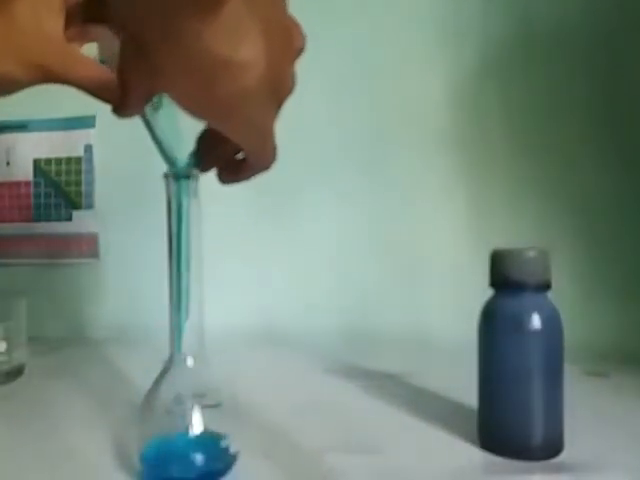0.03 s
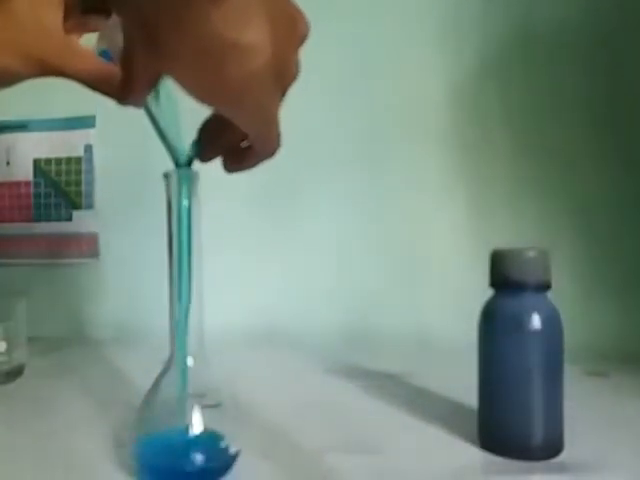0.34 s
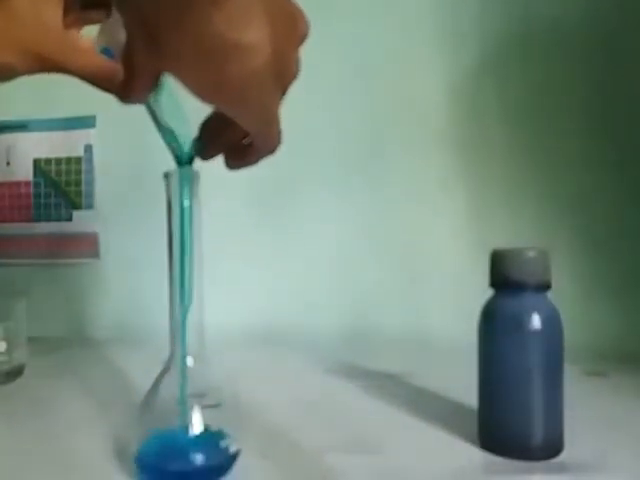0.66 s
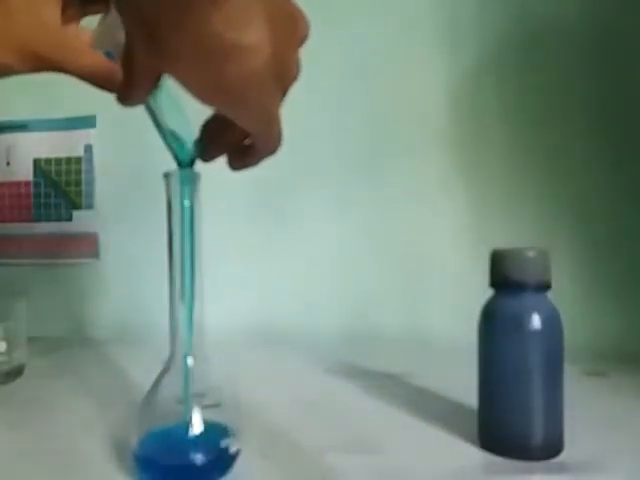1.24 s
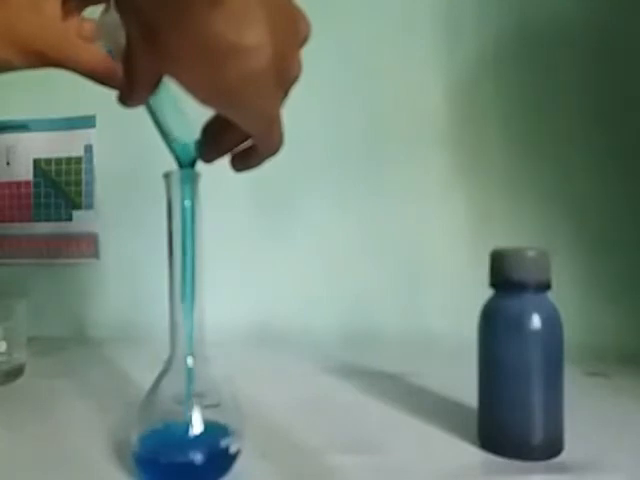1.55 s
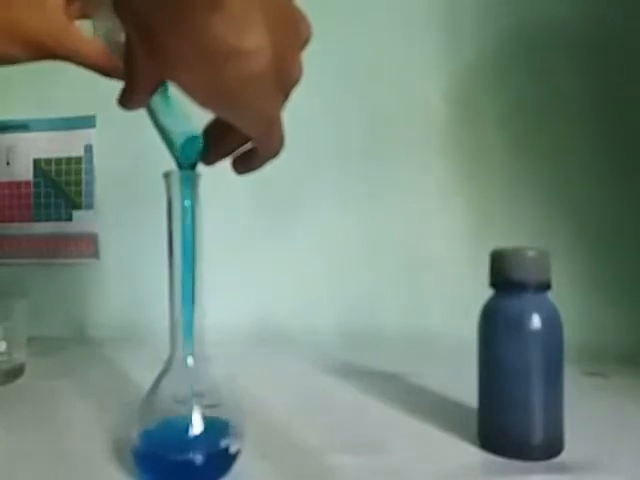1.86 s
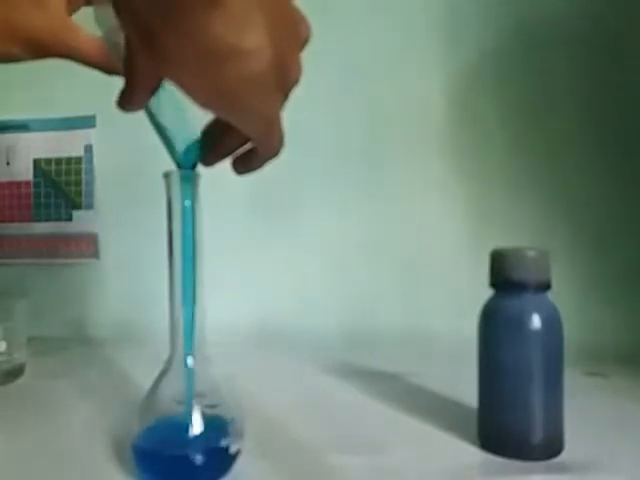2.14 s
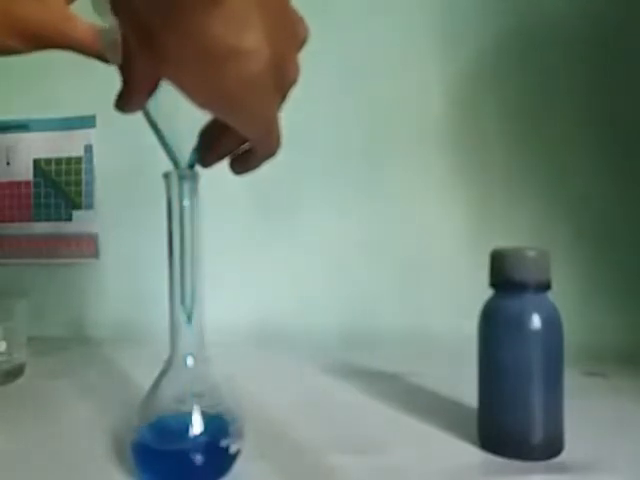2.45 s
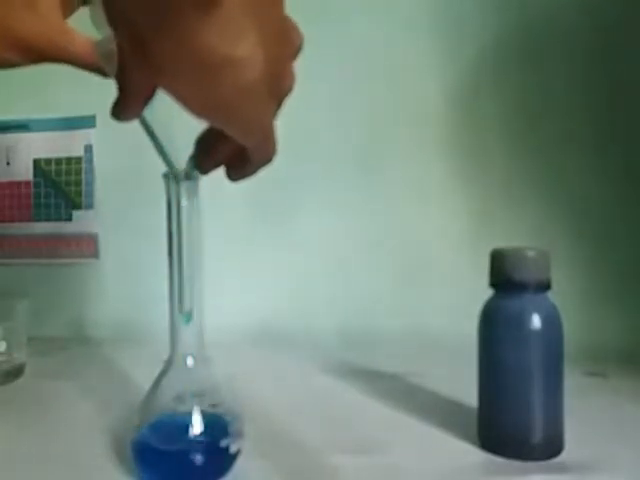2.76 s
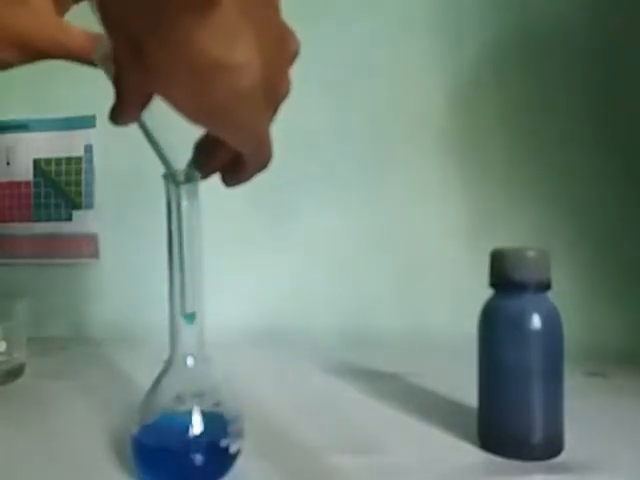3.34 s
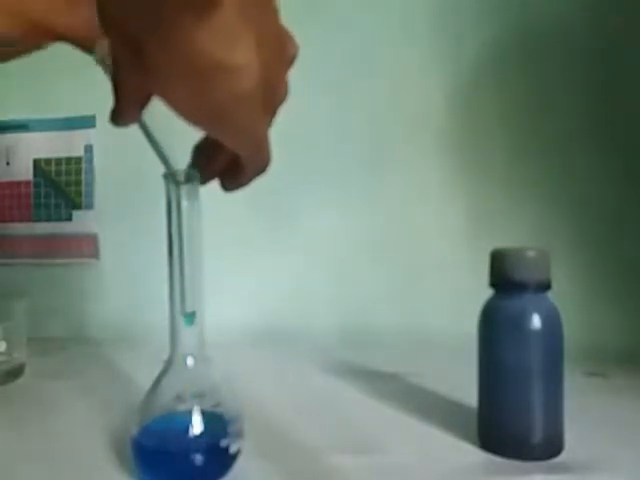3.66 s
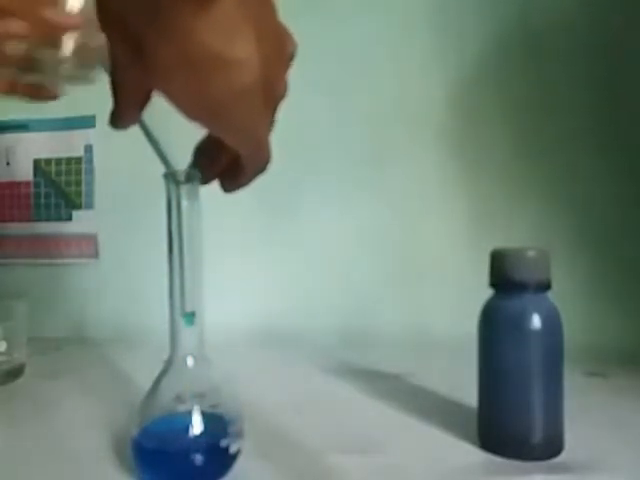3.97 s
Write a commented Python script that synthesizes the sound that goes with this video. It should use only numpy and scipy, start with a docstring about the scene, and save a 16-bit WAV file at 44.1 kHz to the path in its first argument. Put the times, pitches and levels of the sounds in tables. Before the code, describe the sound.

Liquid burbles through a funnel into a glass flask, followed by light glass taps.

```python
"""Liquid burbles and sprays through a glass funnel into a long-necked flask on a table in a small room.
Tiny bubbles tick as they burst and the glass clinks once. Air trapped in the stem breaks loose in plops,
then in rising chirps, and both ring the air in the flask. The flask's belly hums as the funnel empties.
The spray dies away; the burble sinks, then lingers faintly as the funnel taps and rubs against the neck.
Faint room tone and a low rumble lie under it all."""
import sys
import numpy as np
from scipy import signal
from scipy.fft import rfft, irfft
from scipy.io import wavfile

SR = 44100
rng = np.random.default_rng(int(sys.argv[2]) if len(sys.argv) > 2 else 0)


def unload_wav(signal):
    """Save mono or channel-first audio to the path in sys.argv[1] as 16-bit WAV at rate SR, clipped to [-1, 1]."""
    wavfile.write(
        sys.argv[1],
        SR,
        np.round(np.clip(np.atleast_2d(signal).T, -1, 1) * 32767).astype(np.int16),
    )


N = 4 * SR
GRAIN_T, RING_T = np.arange(SR // 20) / SR, np.arange(SR // 2) / SR  # seconds into a bubble, a ring
TOP_HZ = 15800


def undb(db):
    return 10 ** (np.asarray(db) / 20)


def peak(x, db):
    return x * undb(db) / np.abs(x).max()


def unit(x):
    return x / np.sqrt(np.mean(x ** 2))


def fade(t60):
    return np.exp(-np.log(1000) * RING_T / t60)


def add(out, start, x):
    """Mix x in at start seconds."""
    i = int(np.clip(start * SR, 0, N - 1))
    out[i:i + len(x)] += x[:N - i]


def fader(table, column=1):
    """A gain ride through rows of seconds and dB."""
    rows = np.array(table)
    return undb(np.interp(np.arange(N) / SR, rows[:, 0], rows[:, column]))


def noise(colour, size=N):
    """Noise of rms 1, shaped by rows of Hz and dB."""
    hz, db = np.array(colour).T
    bins_hz = np.arange(size // 2 + 1) * SR / size + 1
    eq = undb(np.interp(np.log(bins_hz), np.log(hz), db))
    return unit(irfft(rfft(rng.standard_normal(size)) * eq, size))


def bubble(start_hz, end_hz, glide_s, life_s, attack_s):
    """A short tone that glides to its final pitch as it dies."""
    hz = end_hz + (start_hz - end_hz) * np.exp(-GRAIN_T / glide_s)
    envelope = np.exp(-(GRAIN_T / life_s / 1.61) ** 1.18) * (1 - np.exp(-GRAIN_T / attack_s))
    return peak(np.sin(2 * np.pi * np.cumsum(hz) / SR) * envelope, 0)


def ping(hz, life_s, attack_s):
    """A bubble tone that holds its pitch."""
    return bubble(hz, hz, life_s, life_s, attack_s)


# The colours of the room tone and the rumble. Each row: frequency in Hz, relative level in dB.
ROOM_TONE_EQ = [(25, -52), (55, -15), (92, -4.5), (141, -6.5), (166, -5.5), (223, -7.5), (754, -21),
                (2480, -24.5), (5880, -36), (7110, -27), (8360, -45), (14800, -42.5), (16000, -35)]
RUMBLE_EQ = [(36, -24), (47, -19), (54, 8), (66, 9), (78, -13), (130, -6), (300, -54)]
# The rumble's swell. Each row: time in seconds, level in dB.
RUMBLE_RIDE = [(1.8, -54.5), (2.1, -50), (2.5, -50), (2.75, -58), (3.1, -59.5)]


def room_tone():
    """A steady, faint bed of noise and a low rumble that swells midway."""
    return undb(-54) * noise(ROOM_TONE_EQ) + fader(RUMBLE_RIDE) * noise(RUMBLE_EQ)


# Bounces off table and wall. Each row: delay in seconds, gain in dB.
REFLECTIONS = [(.00195, 2), (.0037, -6), (.0058, -6)]


def echoed(x):
    """Close reflections colour the direct sound."""
    return x + sum(undb(db) * np.pad(x, (int(delay * SR), 0))[:len(x)] for delay, db in REFLECTIONS)


# Air resonances of the flask and its neck. Each row: pitch in Hz, bandwidth in Hz, gain in dB.
FLASK_MODES = [(233.9, 2.6, 22), (340, 11.7, 4.5), (424.4, 89, 9.5), (521.3, 45, 3), (667.5, 27.4, 5),
               (823.6, 63.5, 10.5), (1105, 92, -1.5), (1281, 330, -0.5), (1639, 34, 9), (1630, 130, -10),
               (2820, 610, -9.5), (3119, 117, 10), (4380, 47, 7.5)]


def flask_response():
    """The flask's air rings after an impulse, heard directly and off the table and wall."""
    t = RING_T[:SR // 5]
    ring = sum(undb(db) * 2 * np.pi * width / SR * np.exp(-np.pi * width * t) * np.cos(2 * np.pi * hz * t)
               for hz, width, db in FLASK_MODES)
    bypass = undb(-46) * (t == 0)
    return echoed(ring + bypass)


def burble(flask, per_s=220, centre_hz=688, octaves=1.39, life_s=0.0028, scatter_db=9.5):
    """A swarm of low, rising bubbles rings the flask; rms 1."""
    swarm = np.zeros(N)
    for when, pitch, size, life in rng.random((int(per_s * N / SR), 4)):
        hz = centre_hz * 2 ** (octaves * (2 * pitch - 1))
        grain = bubble(hz, hz * 1.254, life_s, life_s * (.5 + life), life_s / 10)
        add(swarm, when * N / SR, grain * undb(scatter_db * size))
    return unit(signal.fftconvolve(swarm, flask)[:N])


# The colour of droplets and bursting films. Each row: frequency in Hz, relative level in dB.
SPATTER_EQ = [(300, 1.5), (2000, 7), (7000, 1.5), (9000, -7.5), (15000, -6.5)]


def spray(flask, per_s=600, clump_s=.012, clump_db=5.5, click_s=.0006):
    """Droplets land in clumps, each a tiny ping and a faint click, and ring the flask; rms 1."""
    pings, impacts = np.zeros(N), np.zeros(N)
    clumps = np.minimum(rng.standard_normal(N), 1)
    for when, pitch, size, life in rng.random((int(per_s * N / SR), 4)):
        start, hz, life_s = when * N / SR, 2700 * 5.5 ** pitch, .00055 * (.5 + life)
        scatter_db = -4.2 * np.log(.03 + size)  # a few drops stand out
        gain = undb(clump_db * clumps[int(start / clump_s)] + scatter_db)
        colour = undb(np.interp(hz, *np.array(SPATTER_EQ).T))
        add(pings, start, gain * colour * ping(hz, life_s, life_s / 2))
        add(impacts, start, np.array([gain]))
    click_envelope = signal.lfilter([1], [1, -np.exp(-1 / (click_s * SR))], impacts)
    drops = unit(pings) + undb(-9) * unit(click_envelope * noise(SPATTER_EQ))
    flask_ring = unit(signal.fftconvolve(drops, flask)[:N])
    return unit(unit(echoed(drops)) + undb(-3) * flask_ring)


# The ride of the pour. Each row: time in seconds, burble level in dB, spray level in dB.
POUR_RIDE = [(0, -56.5, -56), (.65, -57.5, -55.5), (.95, -49.5, -54), (1.15, -46.5, -57),
             (1.85, -46.5, -54), (2.0, -39, -59), (2.33, -42.5, -57), (2.41, -50.5, -61), (2.7, -72, -71.5),
             (3.0, -62, -92)]


def stream(flask):
    """Falling liquid: the fine spray dies away; the low burble builds, sinks, then lingers faintly."""
    return burble(flask) * fader(POUR_RIDE, column=1) + spray(flask) * fader(POUR_RIDE, column=2)


def film_burst(rise_s=0.0013, ripple_db=6):
    """The spatter of a bursting film swells and dies; every film has its own colour."""
    age = GRAIN_T / rise_s
    hz = np.linspace(300, TOP_HZ, 16)
    db = np.interp(hz, *np.array(SPATTER_EQ).T) + ripple_db * rng.standard_normal(len(hz))
    return noise(list(zip(hz, db)), len(GRAIN_T)) * age * np.exp(1 - age)


# Tiny bubbles popping. Each row: start in seconds, peak level in dB, pitch in Hz.
TICK_CUES = [(0.0364, -29, 3370), (0.187, -32, 5970), (.259, -36, 3190), (0.387, -28.5, 3016),
             (0.419, -42, 7020), (0.434, -32.5, 2250), (.597, -37.5, 13150), (0.687, -32, 6440),
             (0.788, -31, 6520), (0.807, -32.5, 7640), (.84, -45, 5440), (0.95, -32.5, 4450),
             (0.963, -31, 4450), (0.987, -33.5, 4300), (1.255, -28.5, 5820), (1.445, -31.5, 4360),
             (1.625, -31, 5400), (1.694, -34, 7670)]


def ticks(life_s=0.0017, attack_s=0.00078):
    """Small bubbles burst at the surface with a brief ping and a dry crack."""
    out = np.zeros(N)
    for start, db, hz in TICK_CUES:
        tick = ping(hz, life_s, attack_s) + undb(-5) * film_burst(attack_s)
        add(out, start, peak(echoed(tick), db))
    return out


# The colour of glass hitting glass. Each row: frequency in Hz, relative level in dB.
CONTACT_EQ = [(150, -45), (400, 3.5), (1500, 9), (2400, 1.5), (3800, 6.5), (5500, -12.5), (9000, -6.5),
              (16000, -36.5)]


def strike(modes, crack_db, crack_s, attack_s=0.00069):
    """Glass on glass: ringing modes, a contact crack and a short clatter."""
    ring = sum((-1) ** k * undb(db) * np.sin(2 * np.pi * hz * RING_T) * fade(t60)
               for k, (hz, db, t60) in enumerate(modes))
    crack, clatter = np.exp(-RING_T / crack_s), undb(-22) * fade(t60=0.28)
    contact = undb(crack_db) * noise(CONTACT_EQ, len(RING_T)) * (crack + clatter)
    return (ring + contact) * (1 - np.exp(-RING_T / attack_s))


# The ring of the clink. Each row: pitch in Hz, relative level in dB, seconds to fall 60 dB.
CLINK_MODES = [(1495, -12.5, 0.15), (2250, -2, 0.064), (2556, -3.5, 0.13), (2827, -11.5, 0.038),
               (2990, 4, 0.01), (4440, 3.5, 0.0091), (5084, 7, 0.054), (6705, -0.5, 0.057),
               (9540, -8.5, 0.04), (12150, -15, 0.023)]


def clink(start=.0835):
    """One bright knock sets the glass ringing."""
    out = np.zeros(N)
    add(out, start, peak(strike(CLINK_MODES, crack_db=-11, crack_s=0.0071), db=-14))
    return out


# Air breaking loose. Each row: start in seconds, peak level before trim in dB,
# opening pitch in Hz, final pitch in Hz, glide and decay time in seconds.
PLOP_CUES = [(0.274, -33, 1400, 1598, 0.0042), (0.314, -32, 1458, 1588, 0.0073),
             (0.387, -34, 303, 1060, 0.0033), (0.441, -30, 487, 1500, 0.0023),
             (0.482, -25.5, 483, 1330, 0.0014), (0.558, -26.5, 770, 1980, 0.00091),
             (0.588, -24.5, 450, 2180, 0.00068), (0.734, -33.5, 377, 1880, 0.0014),
             (0.795, -24.5, 565, 1820, 0.00075), (0.841, -19, 366, 2000, 0.00093),
             (0.891, -25, 300, 1600, 0.00056), (0.908, -26.5, 490, 2360, 0.0012),
             (1.094, -30.5, 720, 900, 0.0023), (1.155, -28.5, 577, 1130, 0.006),
             (1.288, -21.5, 487, 1860, 0.0015), (1.323, -20.5, 600, 990, 0.0025),
             (1.419, -23, 1000, 1120, 0.0015), (1.483, -28, 520, 2390, 0.0094),
             (1.533, -31, 1384, 1630, 0.0072), (1.622, -28.5, 380, 1900, 0.00022),
             (1.665, -28.5, 780, 1620, 0.00086), (1.693, -31.5, 600, 1317, 0.011),
             (1.715, -21, 620, 947, 0.0052), (1.91, -30, 500, 1710, 0.0014),
             (1.972, -20.5, 433, 1010, 0.0037), (2.004, -22, 500, 590, 0.001),
             (2.044, -21, 500, 700, 0.00037), (2.068, -28.5, 602, 905, 0.0092),
             (2.096, -20.5, 480, 750, 0.00041), (2.133, -27.5, 834, 806, 0.0019),
             (2.236, -33, 380, 1970, 0.00066), (2.26, -22.5, 497, 710, 0.00098),
             (2.272, -23, 606, 910, 0.00081), (2.295, -25, 290, 1573, 0.0081),
             (2.323, -37, 493, 1700, 0.0021), (2.341, -26.5, 405, 1280, 0.0072),
             (2.589, -40.5, 318, 340, 0.0026)]


def plops(flask, trim_db=0.5, splash_db=-23.5):
    """Air trapped in the stem escapes as gliding bubbles that splash and ring the flask."""
    out = np.zeros(N)
    for start, db, start_hz, end_hz, life_s in PLOP_CUES:
        tone = bubble(start_hz, end_hz, life_s, life_s, attack_s=0.00023)
        plop = tone + undb(splash_db) * film_burst()
        add(out, start, peak(signal.fftconvolve(plop, flask), db + trim_db))
    return out


# Slurps of air. Each row: start in seconds, peak level in dB.
CHIRP_CUES = [(1.662, -37), (1.897, -24.5), (1.936, -33), (1.951, -24), (2.006, -31), (2.032, -33),
              (2.12, -31.5), (2.135, -41), (2.164, -30), (2.179, -36), (2.193, -41), (2.206, -22),
              (2.221, -22), (2.242, -54), (2.267, -33), (2.303, -25.5), (2.355, -32)]


def chirps(flask, start_hz=1250, end_hz=2950, attack_s=0.002, splash_db=-24):
    """Air slurped through the stem sweeps up, each chirp at its own pace, and rings neck and flask."""
    out = np.zeros(N)
    neck = undb(-2) * ping(hz=1575, life_s=0.0027, attack_s=attack_s)
    for start, db in CHIRP_CUES:
        glide_s, life_s = np.array([.0035, .0047]) * np.exp(.2 * rng.standard_normal(2))
        tone = bubble(start_hz, end_hz, glide_s, life_s, attack_s)
        chirp = tone + neck + undb(splash_db) * film_burst()
        add(out, start, peak(signal.fftconvolve(chirp, flask), db))
    return out


def belly_hum(start=1.98, end=2.26, db=-48):
    """The flask's belly hums at its lowest air resonance while the funnel empties."""
    hz = FLASK_MODES[0][0]
    band = [(hz / 1.3, -50), (hz / 1.04, -6), (hz, 0), (hz * 1.04, -6), (hz * 1.3, -50), (hz * 10, -120)]
    swell = fader([(start - .1, db - 30), (start, db), (end, db), (end + .25, db - 30)])
    return noise(band) * swell


# The funnel's ring. Each row: pitch in Hz, relative level in dB, seconds to fall 60 dB.
FUNNEL_MODES = [(238.6, -0.5, 0.096), (340, 2, 0.12), (485, 9.5, 0.043), (625, -5.5, 0.16), (848, 1, 0.047),
                (1110, -9, 0.085), (1538, -1.5, 0.13), (1686, 7, 0.032), (3700, 3, 0.012), (4335, 5, 0.02),
                (7363, 10, 0.075), (7740, -2.5, 0.1)]
# Knocks on the neck. Each row: start in seconds, peak level in dB, hardness in dB.
TAP_CUES = [(2.747, -30, -46), (2.777, -42, -35), (2.889, -31, -15.5), (3.056, -35, -31), (3.0779, -19, 2),
            (3.154, -25.5, 4), (3.19, -39, -13), (3.261, -36.5, -0.5)]


def taps(thump_below_hz=400, ring_above_hz=4000):
    """The funnel knocks against the neck; hard taps also thump the table and ring high."""
    out = np.zeros(N)
    for start, db, hardness_db in TAP_CUES:
        modes = [(hz, mode_db + hardness_db * (hz < thump_below_hz or hz > ring_above_hz), t60)
                 for hz, mode_db, t60 in FUNNEL_MODES]
        add(out, start, peak(strike(modes, crack_db=6.5, crack_s=0.0065), db))
    return out


def squeak(hz):
    """A narrow band of noise, heard as an unsteady tone."""
    return noise([(hz / 4, -50), (hz / 1.2, -14), (hz, 0), (hz * 1.15, -18), (hz * 4, -60)])


# Glass sliding on glass. Each row: start and end in seconds, pitch in Hz, squeak level in dB.
RUB_CUES = [(2.895, 3.09, 1870, -60), (3.26, 3.29, 1410, -52.5), (3.929, 3.956, 1500, -52.5)]


def rubs(stem_hz=3740, stem_db=-5.5):
    """The stem slides along the neck in faint squeaks, with its own ring under each."""
    out = np.zeros(N)
    for start, end, hz, db in RUB_CUES:
        pressure = fader([(0, -200), (start - .02, db - 40), (start, db),
                          (end, db - 2), (end + .08, db - 40), (end + 1, -200)])
        out += pressure * (squeak(hz) + undb(stem_db) * squeak(stem_hz))
    return out


def reverb(x, wet_db=-12, crossover_hz=2500, build_s=0.0039):
    """The small room adds a short diffuse tail whose treble dies first."""
    white = rng.standard_normal(len(RING_T))
    low = signal.sosfilt(signal.butter(1, crossover_hz, fs=SR, output="sos"), white)
    tail = low * fade(t60=0.43) + 0.78 * (white - low) * fade(t60=0.29)
    tail *= 1 - np.exp(-RING_T / build_s)
    return x + undb(wet_db) * signal.fftconvolve(x, tail / np.linalg.norm(tail))[:N]


def scene():
    """Liquid and glass share the room's reverb over the room tone, in mono."""
    flask = flask_response()
    liquid = plops(flask) + chirps(flask) + ticks() + stream(flask) + belly_hum()
    glass = clink() + taps() + rubs()
    return (reverb(liquid + glass) + room_tone())[None]


def record(dry):
    """A steep low-pass takes off the very top."""
    return signal.sosfilt(signal.ellip(8, .2, 70, TOP_HZ, fs=SR, output="sos"), dry)


dry = scene()
out = record(dry)
unload_wav(out)
```